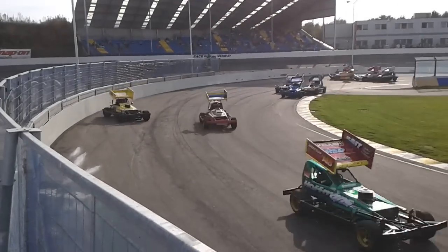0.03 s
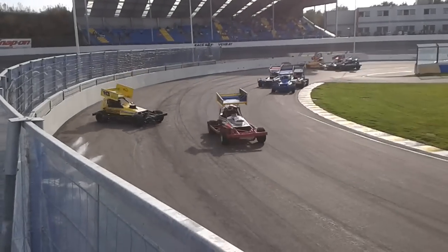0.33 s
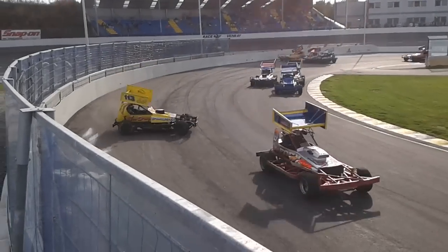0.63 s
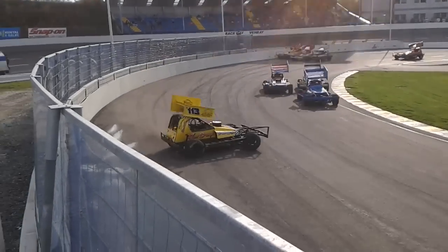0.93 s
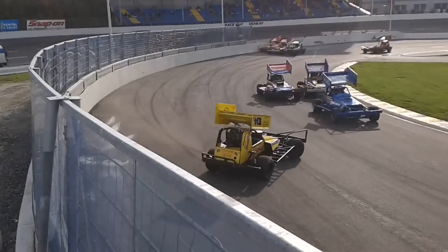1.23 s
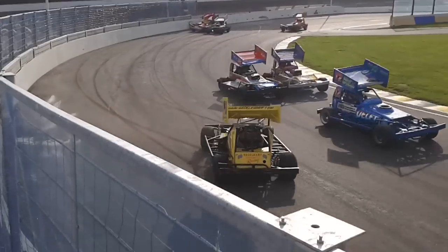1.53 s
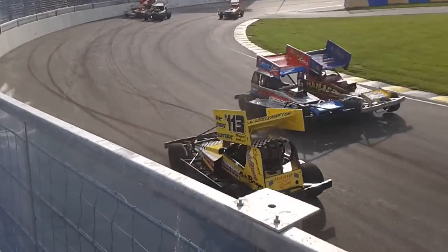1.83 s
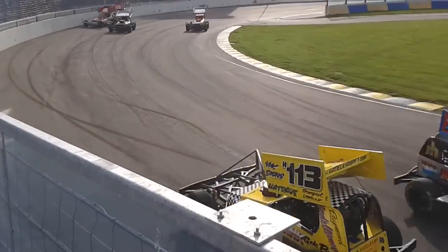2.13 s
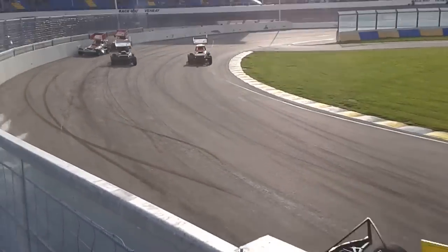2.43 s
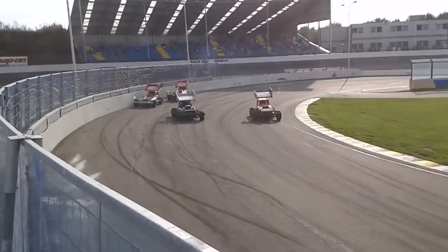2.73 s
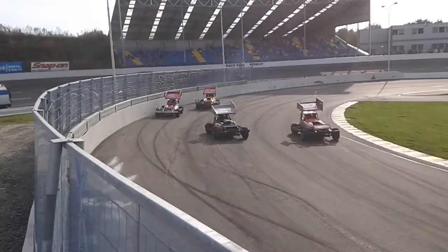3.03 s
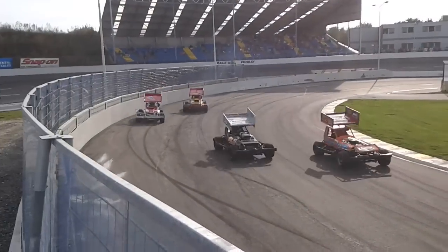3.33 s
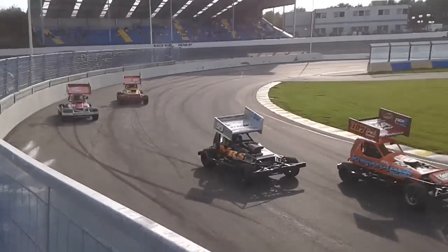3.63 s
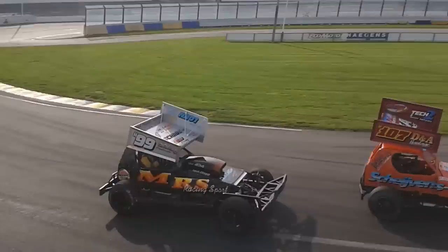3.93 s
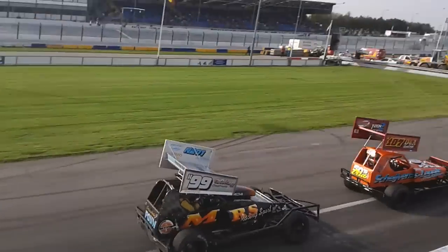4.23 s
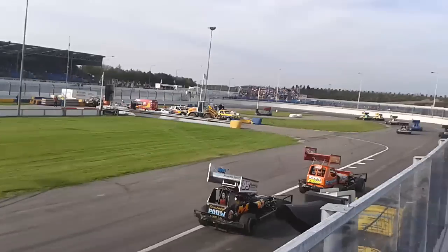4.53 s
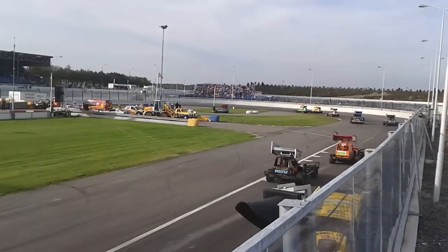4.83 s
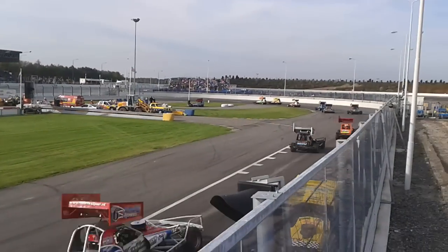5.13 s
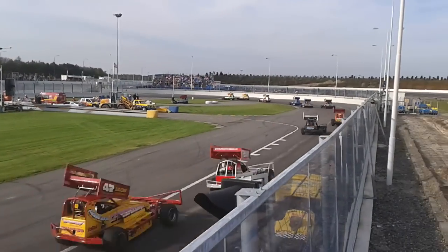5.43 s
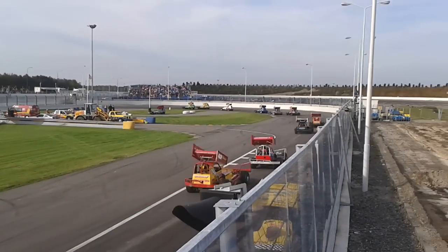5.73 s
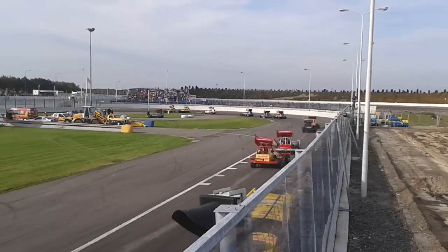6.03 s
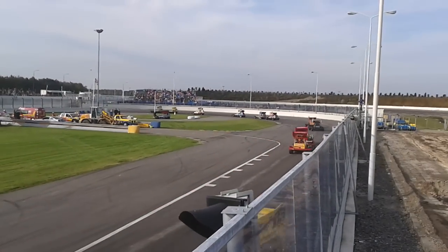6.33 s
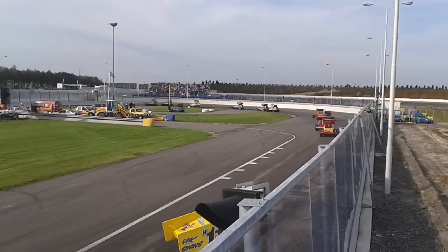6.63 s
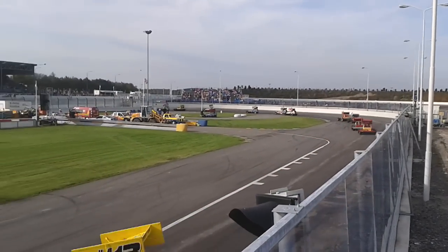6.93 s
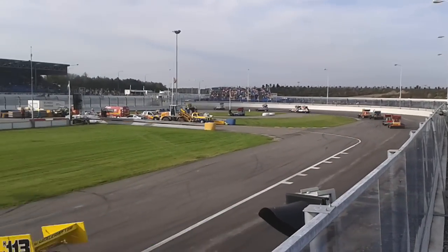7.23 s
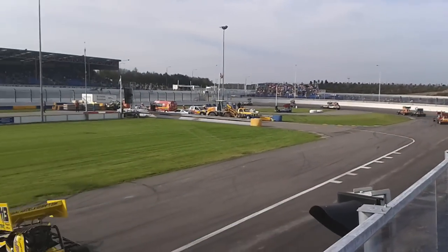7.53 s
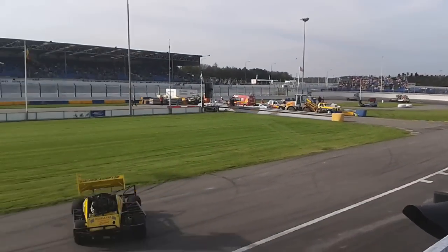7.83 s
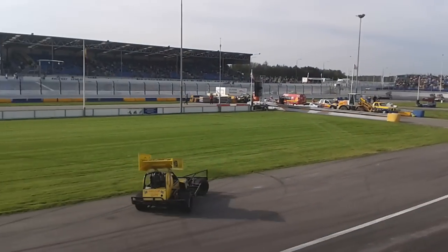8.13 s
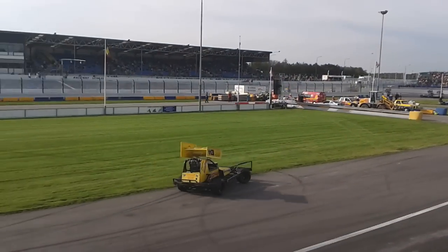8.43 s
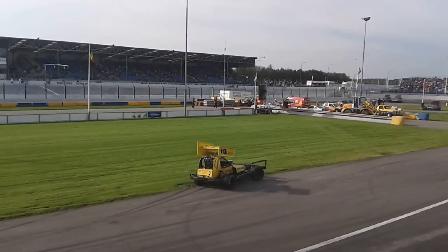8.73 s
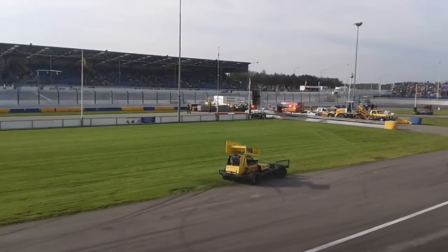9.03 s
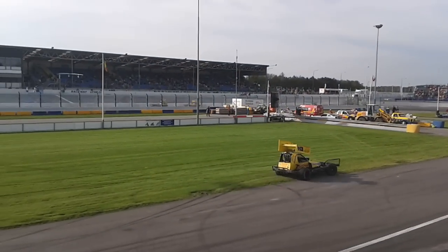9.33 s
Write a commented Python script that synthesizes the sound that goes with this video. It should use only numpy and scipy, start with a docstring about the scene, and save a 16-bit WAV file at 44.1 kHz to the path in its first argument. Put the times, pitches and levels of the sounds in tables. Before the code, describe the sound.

Loud stock car engines drone and rasp close to a trackside microphone, slightly overloading it at the peaks. Cars roar past at the start, at about 1 second and at 2 seconds, with thin hisses and two brief tyre chirps just after 2 seconds. A quick cluster of backfire cracks comes at 2.7 seconds. Short tyre howls follow from 3.3 to 4.2 seconds as another group accelerates by, peaking near 3.8, 4.2, 4.8 and 5.2 seconds. One engine drops in pitch around 6 seconds and another swells briefly at 6.4. The distant pack rumbles and echoes behind. From about 6.7 seconds a spun car squeals and scrubs its tyres, with a higher squeal lasting until 8.5. Its gears whine from about 8 seconds, with a thin hiss, and its engine rises in pitch and loudness to the end at around 9.5 seconds.

```python
"""Stock cars racing past a fence

V8 cars sweep through a bend and away down the straight. Each exhaust drones on its engine orders
and rasps with every firing, while the far pack echoes off the grandstand. Short tyre howls and a
narrow hiss come and go, and one engine backfires; a spun car squeals by stick-slip friction, then
pulls away with whining gears. The loudest peaks overload the microphone."""
import sys
import numpy as np
from scipy import signal
from scipy.fft import rfft, irfft
from scipy.io import wavfile
from scipy.ndimage import uniform_filter1d, minimum_filter1d

SR = 44100
rng = np.random.default_rng(int(sys.argv[2]) if len(sys.argv) > 2 else 0)


def dump(signal):
    """Clip the signal to [-1, 1] and save it as 16-bit WAV at the path in sys.argv[1]."""
    limited = np.clip(np.atleast_2d(signal).T, -1, 1)
    pcm = np.round(limited * 32767).astype(np.int16)
    wavfile.write(sys.argv[1], SR, pcm)


N = 423360
TIME = np.arange(N) / SR
CYLINDERS = 8

# speed and drone of each engine: t/s, cycle rate f/Hz, relative level/dB
ENGINE_RUNS = dict(green=[(0, 41.8, -13.5), (0.3, 41.73, -18.5), (0.55, 41.89, -28.5), (1.15, 43.1, -32)],
               red=[(0, 46.13, -15.5), (.6, 46.48, -11.5), (1, 48.8, -17), (1.3, 47.32, -15.5),
               (1.55, 47, -22), (1.85, 47.35, -17), (2.38, 41.69, -15), (2.75, 41.86, -22.5)],
               blue=[(0.7, 34.93, -22.5), (1.1, 36.66, -27), (1.45, 38.83, -17.5), (1.8, 41.4, -18.5),
               (2, 39.86, -15), (2.3, 39.08, -18.5), (2.8, 34.25, -23.5)], orange=[(2.75, 42.37, -22),
               (3.2, 44.73, -17.5), (3.87, 51.41, -17.5), (4.2, 50.07, -19.5), (4.85, 52.1, -40)],
               black=[(2.95, 25.65, -30.5), (3.37, 28.75, -22), (3.7, 32.48, -23.5), (4.3, 38.13, -18),
               (4.52, 40.96, -9), (4.85, 41.93, -11.5), (5.8, 46.88, -17.5)], white=[(4.1, 26.26, -24.5),
               (4.6, 31.89, -22), (4.9, 33.38, -21.5), (5.8, 36.18, -13.5), (6.4, 39.2, -22),
               (6.75, 41.5, -17.5), (6.95, 37.96, -28.5), (7.5, 35.65, -29.5)], lifting=[(5.25, 43, -22),
               (5.6, 34.5, -22.5), (5.8, 28.6, -15), (6.1, 21.4, -29), (6.7, 9.9, -32)],
               leaving=[(5.85, 48.23, -30.5), (6.05, 48.53, -17.5), (6.38, 51.14, -21), (6.6, 46.78, -21),
               (6.85, 47.33, -25), (7.2, 52.03, -24), (7.6, 49.93, -28)], yellow=[(7.6, 27.44, -34.5),
               (7.9, 28.38, -26.5), (8.45, 32.49, -24.5), (8.9, 36.8, -22.5), (9.2, 40.5, -16),
               (9.6, 42.43, -16)])
# when each car's roar peaks, as it passes or opens up: t/s
ROAR_PEAKS = dict(green=.07, red=1.14, blue=2.08, orange=3.78, black=4.18, white=4.84, lifting=5.21, leaving=6.43, yellow=9.5)
# spectral envelopes of rasp and hiss, for exhausts and tearing rubber: f/Hz, relative level/dB
RASP_SPECTRUM = [(1500, 3.5), (2000, 2.5), (2550, -1.5), (3000, -10), (3500, -19.5), (4200, -32),
                 (6000, -42.5)]
HISS_SPECTRUM = [(3000, -20), (4300, 0), (7700, 3), (8700, -4.5), (11500, 1.5), (15500, -8)]
# main squeal of the spun car: t/s, f/Hz, relative level/dB
SKID_SQUEAL = [(6.7, 1136, -29.5), (7.1, 1185, -24), (7.3, 1130, -22.5), (7.7, 1107, -28),
               (7.95, 1105, -38)]


def undb(db):
    """Amplitude ratio of a level in decibels."""
    return 10 ** (np.asarray(db) / 20)


def unit(x):
    """Normalisation to rms 1."""
    return x / np.sqrt(np.mean(x ** 2))


def curves(table):
    """Linear interpolation of a table's columns against its first, time."""
    times, *columns = np.transpose(table)
    return [np.interp(TIME, times, column) for column in columns]


def gate(table, fade_s=0.17):
    """Trapezoidal envelope: 1 while a table lasts, fading outside it."""
    return np.clip(1 + np.minimum(TIME - table[0][0], table[-1][0] - TIME) / fade_s, 0, 1)


def wander(rate_hz):
    """Interpolated Gaussian noise with a standard deviation near 1."""
    knots = rng.standard_normal(4096)
    return 1.2 * np.interp(TIME * rate_hz, np.arange(len(knots)), knots)


def colour(x, spectrum, size=4096):
    """Minimum-phase filter through points of f/Hz, level/dB, made by folding the cepstrum."""
    hz, db = np.transpose(spectrum)
    bin_hz = np.arange(size // 2 + 1) * SR / size
    gain = undb(np.interp(np.log(bin_hz + 1), np.log(hz), db))
    cepstrum = irfft(np.log(gain))
    cepstrum[1:size // 2] *= 2
    cepstrum[size // 2 + 1:] = 0
    return signal.oaconvolve(x, irfft(np.exp(rfft(cepstrum))))[:N]


def band(x, low_hz, high_hz):
    """Steep band-pass filtering, normalised to rms 1."""
    return unit(signal.sosfilt(signal.butter(4, [low_hz, high_hz], "band", fs=SR, output="sos"), x))


def scatter(x, t60):
    """Diffuse reflection: two colourless decaying tails, crossfaded as the moving cars shift the paths."""
    decay = np.exp(-np.log(1000) * TIME[:SR] / t60)
    spectra = rfft(rng.standard_normal((2, SR)) * decay, 2 * SR)
    tails = irfft(spectra / uniform_filter1d(np.abs(spectra), size=12))[:, :SR]
    one, other = (signal.oaconvolve(x, tail / np.linalg.norm(tail))[:N] for tail in tails)
    angle = 2 * np.pi * 1.6 * TIME + wander(2)
    return one * np.cos(angle) + other * np.sin(angle)


def firings(cycles, uneven_db, gas, jitter=.085):
    """Pulse excitation: eight pressure steps a cycle, each with a puff of turbulent gas."""
    # relative amplitude in firing order; the near cylinder bank is louder
    bank_gains = np.array([1, .4, .4, 1, .4, 1, 1, .4])
    beat = np.abs(CYLINDERS * cycles + jitter * wander(110))  # combustion is never quite on time
    slot = beat.astype(int)
    count = slot.max() + 1
    cylinder_gains = bank_gains * undb(rng.standard_normal(CYLINDERS))
    sizes = np.resize(cylinder_gains, count) * undb(uneven_db * rng.standard_normal(N)[:count])
    puffs = sizes[slot] * np.exp(-(beat - slot) / 0.89)
    return unit(np.diff(puffs, prepend=0)) + gas * unit(puffs * rng.standard_normal(N))


def car(name, weak_db, rumble_db=0, wobble=.003, turn_s=0.55):
    """Periodic firing sounds harmonics of the engine cycle. Returns drone, pulses and their envelope."""
    # harmonics (engine orders) that each car's pipes favour; 8 is the firing rate
    strong_orders = dict(green=(3, 5, 8), red=(3, 5, 8), blue=(5, 8), orange=(3, 4, 8), black=(3, 4, 5, 8),
                     white=(5, 8), lifting=(5, 8), leaving=(3, 5), yellow=(3, 5, 8, 9, 10, 11, 12))
    # strength of each of those orders: relative level/dB
    order_levels = dict(green=(-7, -1, -1.5), red=(-6, -0.5, -3.5), blue=(-5, -1), orange=(-1.1, 0.5, -6.5),
                    black=(-15.5, -16, -14.5, 0), white=(-9, 0), lifting=(-8.5, -0.5), leaving=(-5, -0.5),
                    yellow=(0, -1, 1, -4, -5.5, -11, -13))
    hz, db = curves(ENGINE_RUNS[name])
    cycles = np.cumsum(hz * (1 + wobble * wander(25))) / SR
    orders = strong_orders[name]
    # directivity: tail-on, orders below the firing rate gain rumble_db and the rest lose as much
    turn_db = rumble_db * np.tanh((TIME - ROAR_PEAKS[name]) / turn_s)
    levels = [db + order_db + (turn_db if k < CYLINDERS else -turn_db)
              for k, order_db in zip(orders, order_levels[name])]
    gains = undb(levels) * gate(ENGINE_RUNS[name])
    envelope = np.sqrt(np.mean(gains ** 2, axis=0))
    # unequal pipes leak weaker orders between the strong ones
    weak = [(k, envelope * undb(weak_db)) for k in range(3, 10) if k not in orders]
    drone = sum(gain * (1 + 0.16 * wander(11)) * np.sin(2 * np.pi * (k * cycles + rng.random()))
                for k, gain in [*zip(orders, gains), *weak])
    return np.sqrt(2) * drone, envelope * firings(cycles, uneven_db=2.0, gas=1.51), envelope


def roar_gains():
    """Spherical spreading: each car's roar falls as 1/distance, and the cars' powers add."""
    # each car's swell: half-width t/s (sign ignored), then peak level/dB of boom, bark, rasp, hiss
    swells = dict(green=(0.5, -25, -21, -32, -49), red=(0.36, -25.5, -16.5, -27, -53.5),
              blue=(0.28, -14.5, -20, -32.5, -51), orange=(0.33, -25.5, -20.5, -34.5, -53),
              black=(0.26, -27.5, -21.5, -30, -48.5), white=(0.3154, -30, -22, -23, -49),
              lifting=(0.26, -18, -18.5, -37.5, -47.5), leaving=(-0.04, -24, -25.5, -33.5, -58),
              yellow=(0.44, -21.5, -20, -25, -50))
    spreads = (2.18, 1.16, 1, 0.49)  # width factors: bass spreads all round, treble beams from the pipe
    power = 0
    for name, (width_s, *levels_db) in swells.items():
        distances = [np.hypot(1, (TIME - ROAR_PEAKS[name]) / (width_s * spread)) for spread in spreads]
        power += (undb(levels_db)[:, None] / distances) ** 2
    return np.sqrt(power)


def exhausts(pulses):
    """Source and filter: firings ring pipes and fence, in four bands that swell as the cars pass."""
    # response of the pipes: f/Hz, relative level/dB
    pipe_spectrum = [(60, -22), (90, -11), (130, -3.5), (240, -1.5), (350, -3), (460, -9), (600, -10.5),
                     (800, -10), (1150, -14.5), (1500, -25), (2400, -27)]
    boom_gain, bark_gain, rasp_gain, hiss_gain = roar_gains()
    echoed = 0.76 * pulses + 0.57 * scatter(pulses, t60=0.097) + scatter(pulses, t60=0.57)
    pipes = colour(echoed, pipe_spectrum)
    boom = band(pipes, 65, 513) * boom_gain
    bark = band(pipes, 416, 1914) * bark_gain
    rasp = band(colour(echoed, RASP_SPECTRUM), 1600, 6120) * rasp_gain
    hiss = band(colour(echoed, HISS_SPECTRUM), 3600, 16000) * hiss_gain
    return boom + bark + rasp + hiss


def far_pack(count=5, cycle_hz=38):
    """Reverberation: distant engines, on and off the throttle, blur in the grandstand's echo."""
    # the distant roar: f/Hz, relative level/dB
    pack_spectrum = [(25, -42.5), (62, -16.5), (92, 4.5), (135, -0.5), (300, -2), (450, -13), (1100, -14),
                     (2500, -24.5), (4000, -62)]
    # it stands out once the near cars have gone: t/s, mean level/dB
    pack_levels = [(5.4, -25), (6.8, -22)]
    rates_hz = (cycle_hz * np.exp(.14 * wander(.7)) for _ in range(count))
    engines = sum(firings(np.cumsum(hz) / SR, uneven_db=0, gas=0.89) for hz in rates_hz)
    db, = curves(pack_levels)
    return unit(colour(scatter(engines, t60=0.79), pack_spectrum)) * undb(db + wander(3.04))


def howls_and_hisses():
    """Narrow-band noise: short tyre howls, and longer hisses near 2.4 kHz, perhaps brakes or intake."""
    # centre t/s, half-width t/s, centre f/Hz, bandwidth f/Hz, peak level/dB
    noise_bands = [(.1, 0.26, 2350, 205, -30.5), (1.118, .07, 3920, 160, -48),
                   (1.607, 0.35, 2360, 250, -30.5), (2.048, 0.054, 1410, 79.96, -31),
                   (2.32, 0.056, 1305, 91, -27), (3.346, .4, 2423, 216.4, -36),
                   (3.383, 0.11, 742.5, 25, -17), (3.706, 0.15, 1180, 120, -25),
                   (3.843, 0.13, 968, 89.5, -21.5), (4.146, 0.044, 778, 91, -16.5),
                   (7.808, 0.027, 1524, 79.4, -18.5), (8.6, 0.48, 2564, 280, -32.5)]
    out = np.zeros(N)
    for centre_s, width_s, hz, width_hz, db in noise_bands:
        swell = np.exp(-2 * ((TIME - centre_s) / width_s) ** 2)
        out += band(rng.standard_normal(N), hz - width_hz / 2, hz + width_hz / 2) * swell * undb(db)
    return out


def gear_whine(name, level_db, flutter=.0025):
    """Loaded gears radiate at their tooth-meshing frequency, in step with the engine."""
    # meshes per engine cycle, start t/s, peak t/s, end t/s
    orange_gear = (75.5, 2.7, 3.15, 3.7)
    yellow_gear = (53.5, 7.85, 8.15, 9.2)
    meshes, *times = dict(orange=orange_gear, yellow=yellow_gear)[name]
    cycle_hz, _ = curves(ENGINE_RUNS[name])
    mesh_hz = meshes * cycle_hz * (1 + flutter * wander(90))
    load = np.interp(TIME, times, [0, 1, 0])
    return np.sin(2 * np.pi * np.cumsum(mesh_hz) / SR) * undb(level_db + 2 * wander(18)) * load


def backfires(ring_hz=370, ring_s=0.0013, crack_s=0.00033):
    """Unburnt fuel explodes in a pipe: a shock front, then a heavily damped resonance."""
    # t/s, relative pressure step
    explosions = [(2.7162, -0.24), (2.7263, 0.75), (2.7361, -1), (2.738, .75), (2.7462, 0.47),
                  (2.7671, 0.62)]
    out, t = np.zeros(N), TIME[:SR // 50]
    ring = 0.94 * np.exp(-t / ring_s) * np.cos(2 * np.pi * ring_hz * t)
    shock = 0.33 * np.exp(-t / crack_s)
    for start_s, step in explosions:
        start = int(start_s * SR)
        out[start:start + len(t)] += step * (ring + shock)
    return out


def tyre_squeals():
    """Stick-slip oscillation: two unsteady tones break up as the tread gains and loses grip."""
    # the later, higher squeal: t/s, f/Hz, relative level/dB
    high_squeal = [(7.35, 1479, -34), (7.75, 1485, -35), (8.05, 1524, -27), (8.2, 1552, -38),
                   (8.5, 1544, -31)]
    out = np.zeros(N)
    for table, boost_db, jitter, octave_db in (SKID_SQUEAL, 1, .065, -14), (high_squeal, 4, .0279, -18.5):
        hz, db = curves(table)
        slip_hz = hz * (1 + jitter * wander(330) + 0.032 * wander(18))
        phase = 2 * np.pi * np.cumsum(slip_hz) / SR
        envelope = undb(db + boost_db + 1.85 * wander(34)) * gate(table)
        tone = (np.sin(phase) + undb(octave_db) * np.sin(2 * phase)) * envelope
        out += 0.66 * tone + 1.15 * scatter(tone, t60=0.41)
    return out


def tyre_scrub(judder_hz=33, grit_db=-27):
    """Amplitude-modulated friction noise: spinning wheels hop, tear at the asphalt and throw grit."""
    hops = np.cumsum(judder_hz * (1 + 0.2 * wander(20))) / SR
    db = np.interp(TIME, [6.85, 7.1, 7.66, 7.75], [-44, -32.5, -30.5, -44]) + 2 * wander(35)
    tearing = rng.standard_normal(N) * np.exp(-2 * (hops % 1))
    rubber = unit(colour(band(tearing, 1860, 4610), RASP_SPECTRUM))
    grit = undb(grit_db) * unit(colour(tearing, HISS_SPECTRUM))
    return (rubber + grit) * undb(db) * gate(SKID_SQUEAL)


def scene():
    """Superposition of near cars, far pack, tyres, hisses, gears and backfires in one channel."""
    cars = [car("green", weak_db=-10, rumble_db=1.6),
            car("red", weak_db=-9),
            car("blue", weak_db=-24, rumble_db=-1.3),
            car("orange", weak_db=-7, rumble_db=4.5),
            car("black", weak_db=-6.5, rumble_db=9),
            car("white", weak_db=-11, rumble_db=4),
            car("lifting", weak_db=-13.5, rumble_db=-2),
            car("leaving", weak_db=-20, rumble_db=-1.2),
            car("yellow", weak_db=-8.5, rumble_db=2.5)]
    drones, pulses, envelopes = zip(*cars)
    levelled_pulses = unit(sum(pulses) / (np.linalg.norm(envelopes, axis=0) + 1e-4))
    engines = sum(drones) + exhausts(levelled_pulses)
    squeals = tyre_squeals()
    whine = gear_whine("yellow", level_db=-32.5) + gear_whine("orange", level_db=-51)
    return (engines + far_pack() + howls_and_hisses() + whine + backfires() + squeals + tyre_scrub())[None]


def record(dry, limit=0.79, ceiling=0.65, knee=0.57, cutoff_hz=15750):
    """Overload: a fast limiter holds the roar down, saturation rounds the peaks, a low-pass follows."""
    gain = limit / np.maximum(np.abs(dry), limit)
    held = dry * uniform_filter1d(minimum_filter1d(gain, size=90), size=90)
    excess = np.maximum(np.abs(held) - knee, 0)
    headroom = ceiling - knee
    rounded = np.sign(held) * (np.abs(held) - excess + headroom * np.tanh(excess / headroom))
    return signal.sosfilt(signal.ellip(8, .2, 70, cutoff_hz, fs=SR, output="sos"), rounded)


dry = scene()
out = record(dry)
dump(out)
```